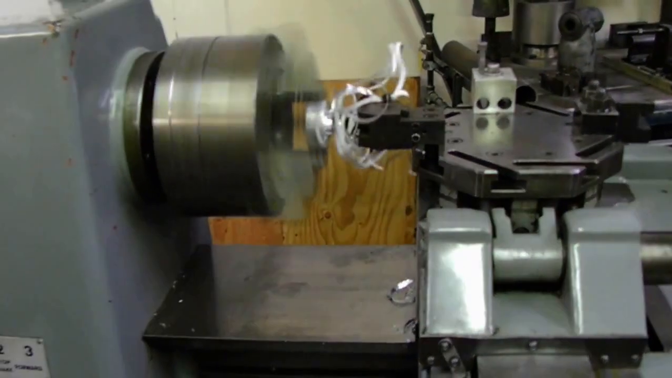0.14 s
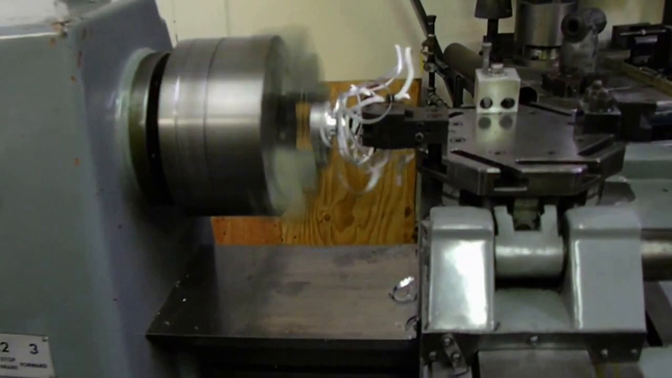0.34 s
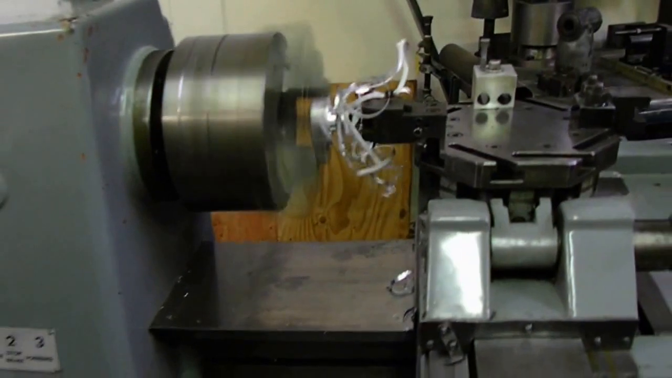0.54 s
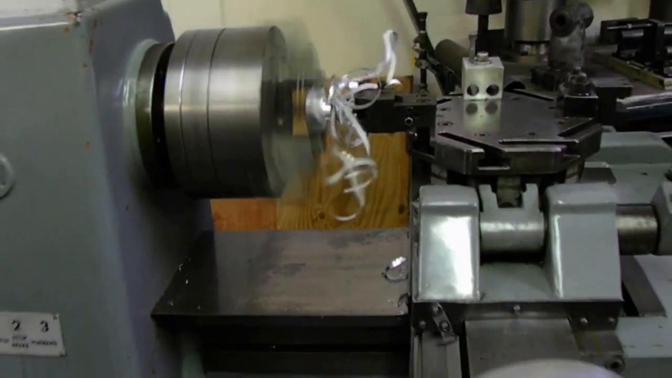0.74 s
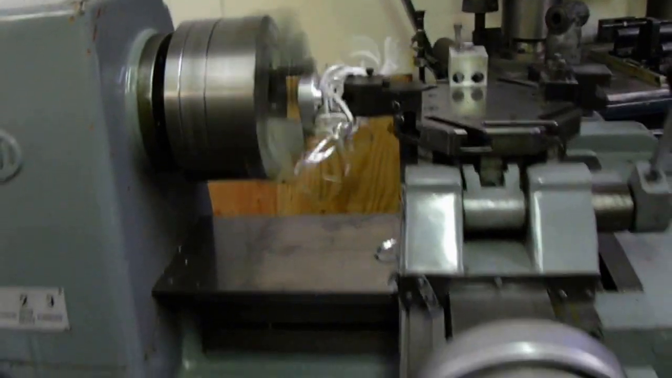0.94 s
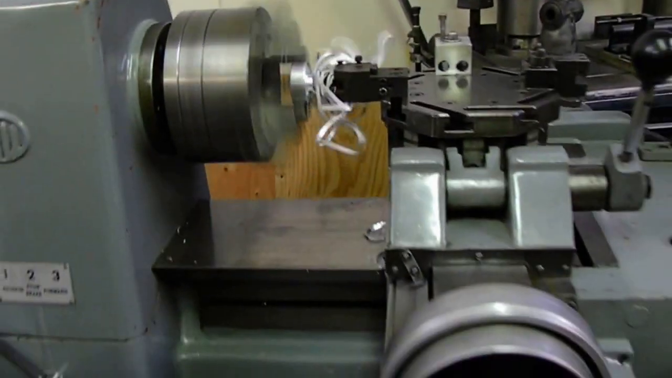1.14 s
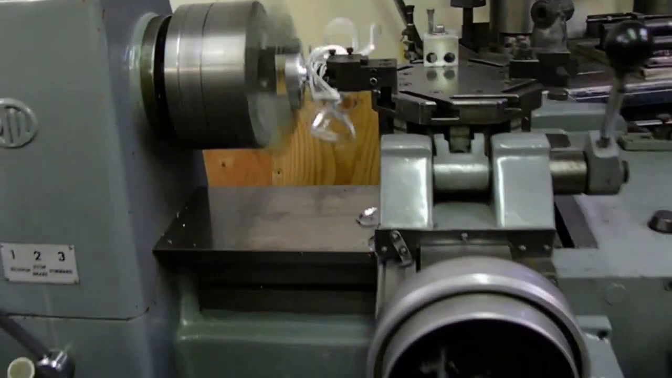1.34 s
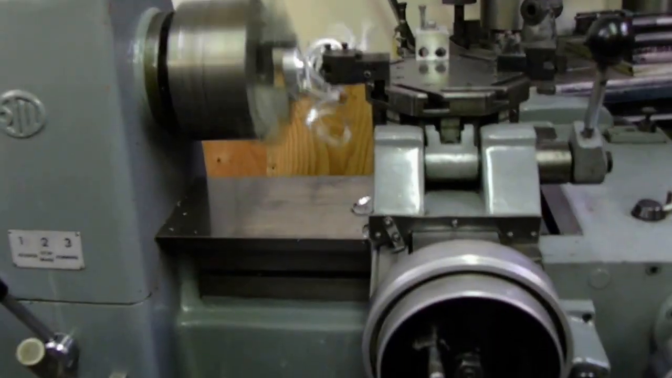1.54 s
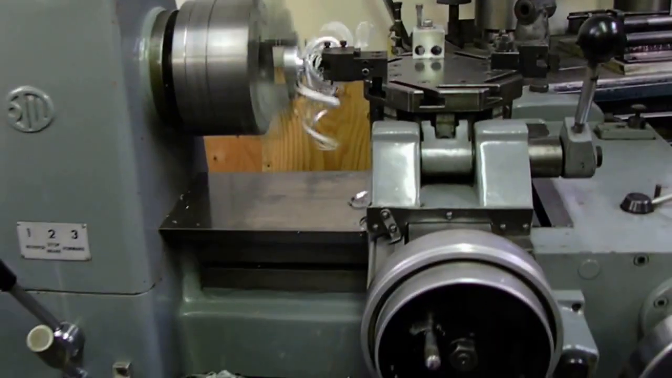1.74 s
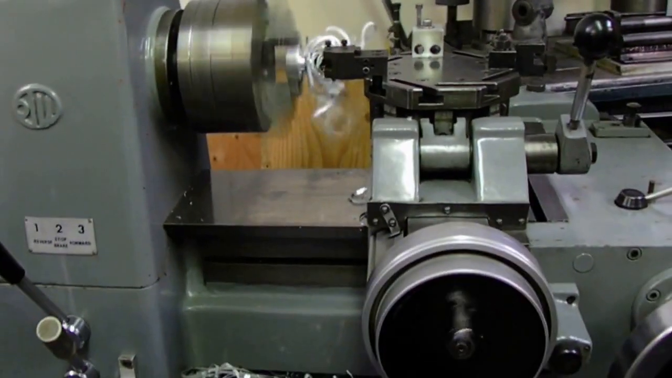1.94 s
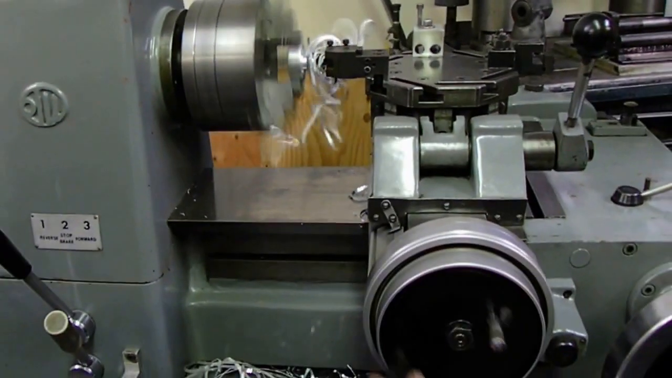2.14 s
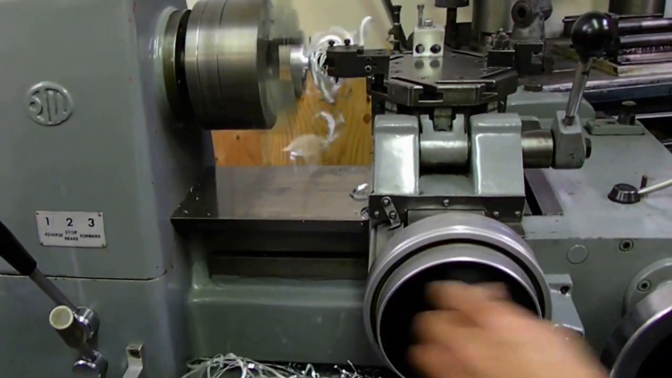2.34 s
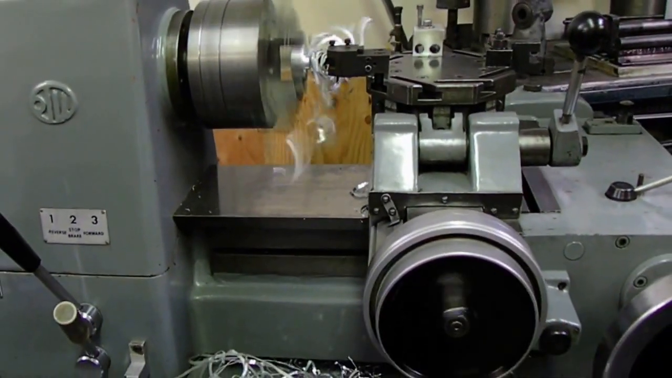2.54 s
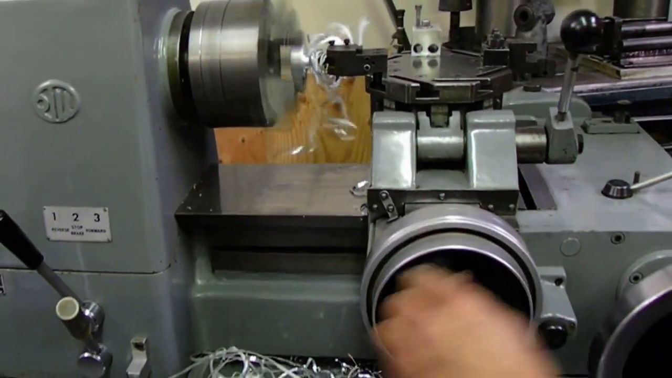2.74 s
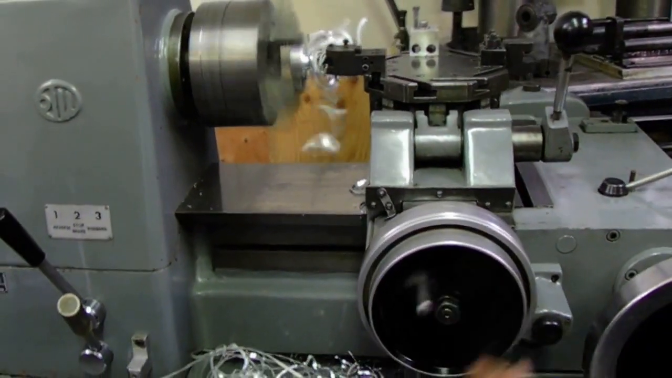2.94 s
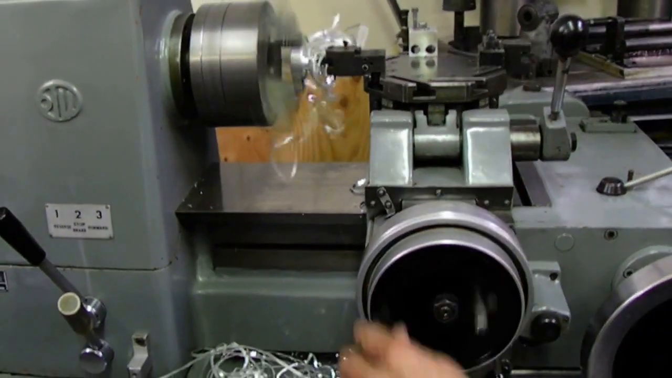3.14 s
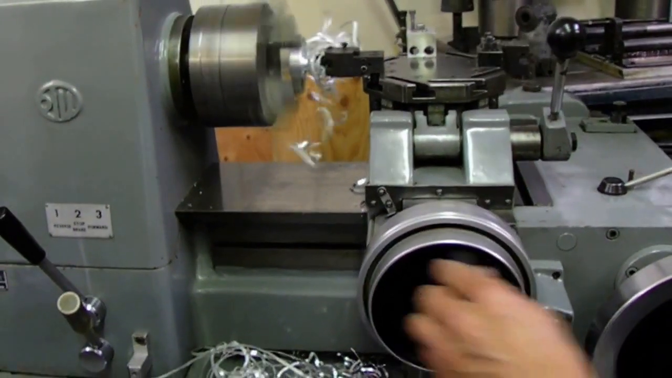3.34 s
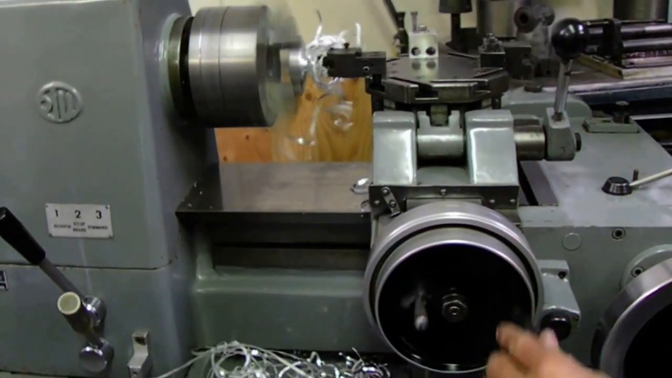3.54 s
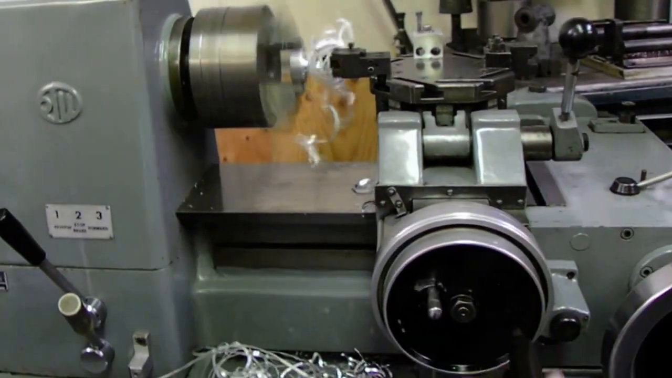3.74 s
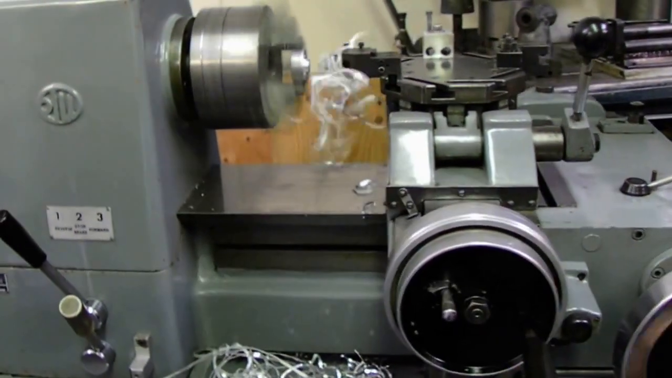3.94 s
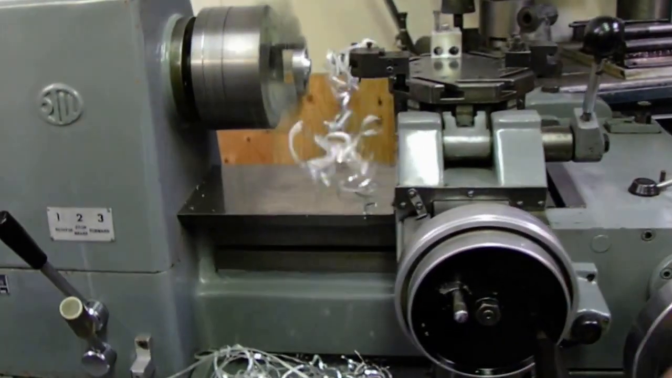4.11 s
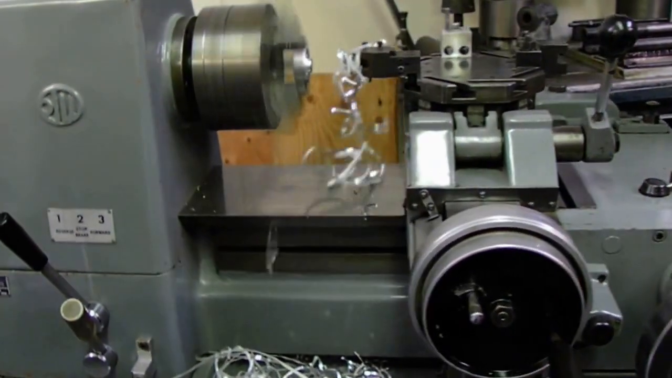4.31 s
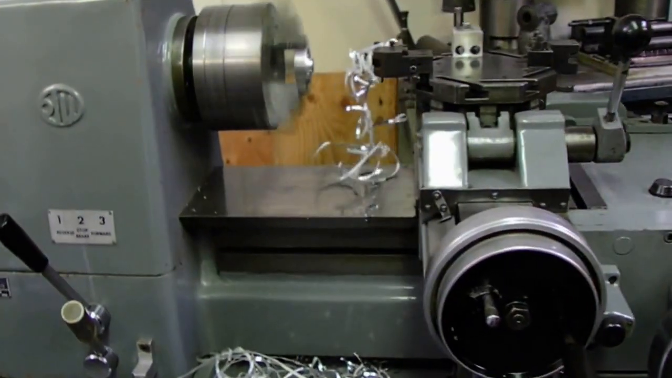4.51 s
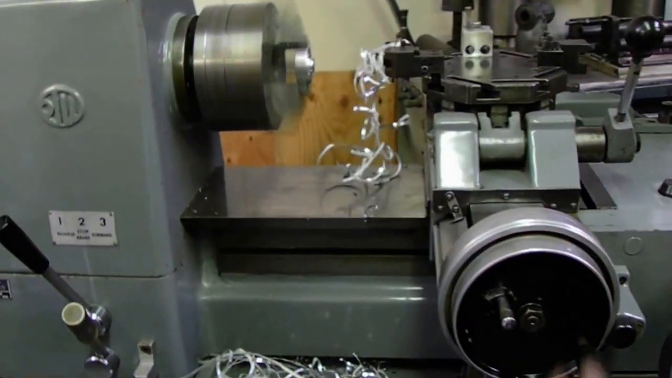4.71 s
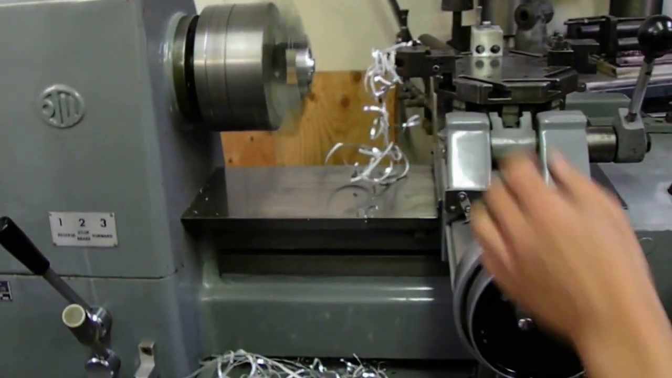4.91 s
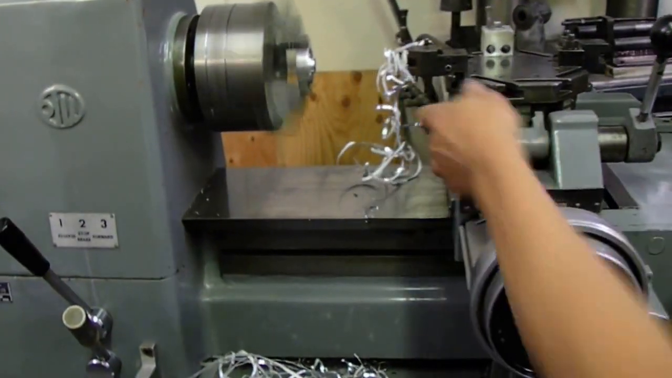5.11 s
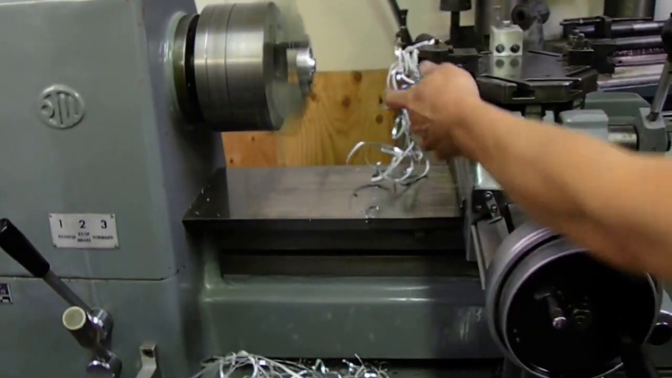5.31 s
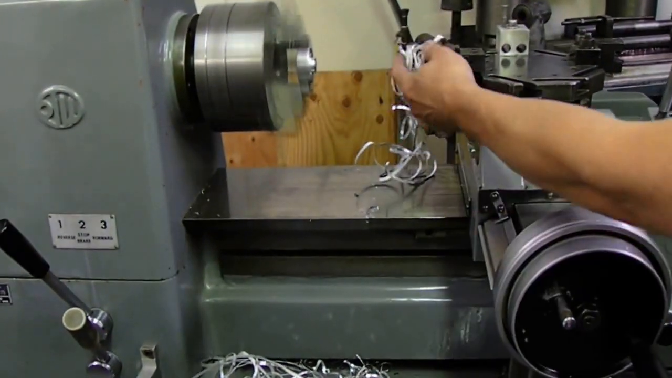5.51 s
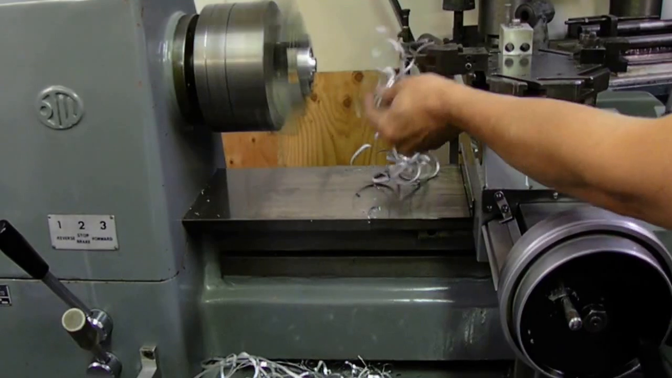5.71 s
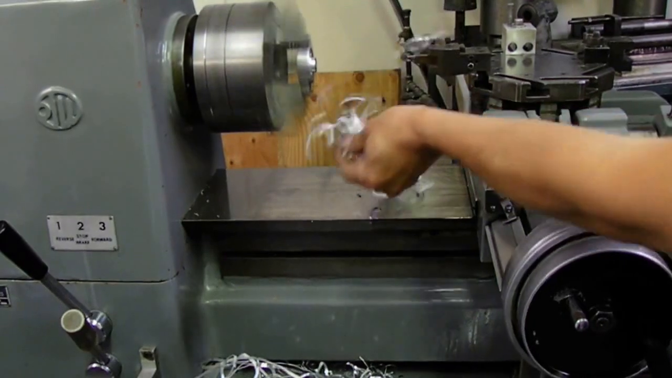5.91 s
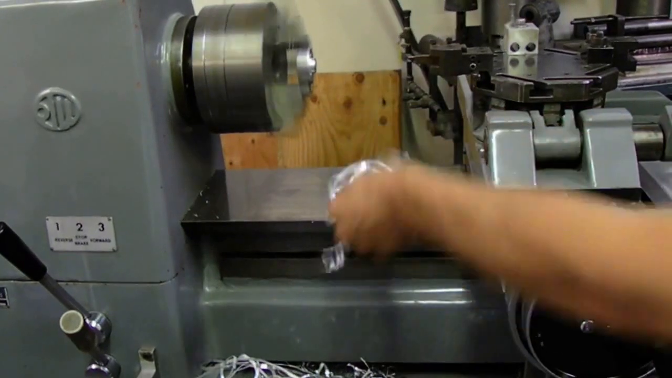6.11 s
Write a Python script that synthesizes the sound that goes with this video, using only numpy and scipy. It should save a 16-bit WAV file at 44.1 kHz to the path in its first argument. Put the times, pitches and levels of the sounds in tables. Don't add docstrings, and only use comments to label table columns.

```python
import sys
import numpy as np
from scipy import signal
from scipy.fft import rfft, irfft, next_fast_len
from scipy.io import wavfile
from scipy.ndimage import uniform_filter1d

SR = 44100
rng = np.random.default_rng(int(sys.argv[2]) if len(sys.argv) > 2 else 0)


def wav_out(sig):
    wavfile.write(sys.argv[1], SR, np.round(np.clip(np.atleast_2d(sig).T, -1, 1) * 32767).astype(np.int16))


def makeup_ratio(level_db):
    decades = np.asarray(level_db, float) / 20
    return 10 ** decades


N = 276066


def evened(x):
    return x / np.sqrt(np.mean(x ** 2) + 1e-20)


def curve(rows, column):
    rows = np.array(rows)
    return np.interp(np.arange(N) / SR, rows[:, 0], rows[:, column])


def shaped(x, gain):
    size = next_fast_len(N)
    return irfft(rfft(x, size) * gain(np.fft.rfftfreq(size, 1 / SR)), size)[:N]


FLAT_ABOVE_HZ = 15200


def spectrum_db(points, hz):
    f, db = np.transpose(points)
    return np.interp(np.log(np.minimum(hz, FLAT_ABOVE_HZ) + 1), np.log(f + 1), db)


def modes(table, hz):
    power = sum(makeup_ratio(db) ** 2 / (1 + (2 * (hz - f) / width) ** 2) ** 1.37 for f, width, db in table)
    return np.sqrt(power)


def wander(top_hz):
    steps = rng.standard_normal(N * 1000 // SR + 1002)
    pole = np.exp(-2 * np.pi * top_hz / 1000)
    slow = signal.filtfilt([1], [1, -pole], steps)[500:-500]
    return np.interp(np.arange(N) * 1000 / SR, np.arange(len(slow)), evened(slow - slow.mean()))


def grit(per_s, spread_db):
    size = makeup_ratio(spread_db * np.minimum(rng.exponential(1, N), 3)) * rng.choice([-1., 1.], N)
    return evened(size * (rng.random(N) < per_s / SR))


def add(mix, s, sound):
    part = mix[round(s * SR):][:len(sound)]
    part += sound[:len(part)]


# t60 in seconds, level in dB against the direct sound, lower edge in Hz.
SHOP_TAIL = (.35, -6, 2500)


def shop(x):
    t60_s, tail_db, above_hz = SHOP_TAIL
    age = np.arange(SR // 2) / SR
    tail = rng.standard_normal(len(age)) * makeup_ratio(-60 * age / t60_s) * (age > .003)
    bright = shaped(x, lambda hz: hz ** 2 / (hz ** 2 + above_hz ** 2))
    return x + makeup_ratio(tail_db) * signal.oaconvolve(bright, tail / np.linalg.norm(tail))[:N]


# time in seconds, roar in dB.
DRIVE_LEVEL = [
    (0, -29),
    (1, -29.5),
    (2, -31),
    (2.7, -29.5),
    (4.5, -28.5),
    (5.5, -27),
    (6.26, -26.5),
]
# frequency in Hz, density in dB per Hz.
ROAR_SPECTRUM = [(15, -89), (25, -39.5), (96, -21), (183, -19), (240, -17.5), (457, -13.5), (537, -9.5),
                 (804, -8.5), (919, -3.5), (1240, -5.5), (3440, -15.5), (6920, -16.5), (7910, -22),
                 (9300, -21.5), (15500, -60)]
# frequency in Hz, width in Hz, gain in dB.
CASING_MODES = [(107, 35, 6), (204, 86, -10.5), (242, 32, 10), (557, 28, 7.5), (679, 77, 5), (806, 100, -2),
                (901, 54, 4), (1026, 37, 4.5), (1290, 214, -5.5), (1570, 75, -1), (1918, 44, 6.5),
                (3490, 50, 7.5), (4580, 180, 4.5), (6900, 540, 1.5)]
GEAR_TONES_HZ = [89.5, 102.3, 110, 120, 359.5, 534, 543, 693, 899, 927.5, 954, 1015, 1096, 1174, 1315, 1476,
                 1555, 2003]
# level in dB relative to the roar, waver in Hz.
GEAR_LEVELS = [(-46, 0.14), (-35, 1.04), (-49, .3), (-36.5, 0.17), (-23.5, 2.64), (-17.5, 3.15),
               (-20.5, 3.23), (-21.5, 6.03), (-16, 3.45), (-8, 3.05), (-20, 3.4), (-21.5, 4.2), (-21, 4.14),
               (-21, 3.4), (-20.5, 2.24), (-23, 2.4), (-17, 1.15), (-25, 6.7)]
BEARINGS_DB = -0.5
LOADED_DB, FREE_DB, LOADED_UNTIL_S, FREE_FROM_S = -5.5, 2.5, 0.7, 5


def headstock():
    def casing(hz):
        peaks_db = sum(db * np.exp(-(2 * (hz - f) / width) ** 2 / 2) for f, width, db in CASING_MODES)
        return makeup_ratio(spectrum_db(ROAR_SPECTRUM, hz) + peaks_db)
    rumble = rng.standard_normal(N) + 0.22 * grit(1500, spread_db=3.5)
    roar = evened(shaped(rumble, casing))
    treble = shaped(roar, lambda hz: hz ** 2 / (hz ** 2 + 2500 ** 2))
    roar = roar + (makeup_ratio(BEARINGS_DB) - 1) * treble
    tones = 0
    for hz, (db, waver_hz) in zip(GEAR_TONES_HZ, GEAR_LEVELS):
        phase = 2 * np.pi * (np.cumsum(hz + waver_hz * wander(5.84)) / SR + rng.random())
        tones = tones + makeup_ratio(db + 1.8 * wander(6)) * np.sin(phase)
    load_db = curve([(LOADED_UNTIL_S, LOADED_DB), (FREE_FROM_S, FREE_DB)], 1)
    return makeup_ratio(curve(DRIVE_LEVEL, 1) + 2.0) * (roar + makeup_ratio(load_db + 1) * tones)


def ring(hz, db, t60_s):
    age = np.arange(4000) / SR
    return makeup_ratio(db - 60 * age / t60_s) * (1 - np.exp(-age * hz * 0.84)) * np.sin(2 * np.pi * hz * age)


# time in seconds, peak in dB, pitch in Hz.
CURL_TICKS = [(4.2826, -15.5, 8870), (4.4637, -18.5, 8960), (4.5432, -24, 9680), (4.5696, -19, 8700),
              (4.7801, -19, 9200), (4.87, -22, 9130), (4.984, -18, 9350), (5.0973, -18, 9340),
              (5.1648, -20, 9200), (5.276, -24, 9290), (5.2994, -23, 9670), (5.3778, -27, 8470),
              (5.4585, -17.5, 8950), (5.5494, -20, 8800)]
# time in seconds, peak in dB.
LATCH_KNOCK = (4.6669, -5.5)
# frequency in Hz, level in dB, t60 in seconds.
LATCH_MODES = [(1480, -8, .02), (1720, -8, .015), (1920, -9, .018), (2120, -1, .009), (2450, -4, .007),
               (2800, -2, .007), (3150, -3, .007), (3550, -5, .008), (4560, -27, .2)]


def small_hits():
    out = np.zeros(N)
    for s, db, hz in CURL_TICKS:
        tick = ring(hz, db - 2.5, 0.019) + ring(.76 * hz, db - 0.5, 0.0098) + ring(1.08 * hz, db - 7, .01)
        add(out, s, tick)
    knock_s, knock_db = LATCH_KNOCK
    knock = sum(ring(*mode) for mode in LATCH_MODES)
    add(out, knock_s, makeup_ratio(knock_db) * knock / abs(knock).max())
    return shaped(out, lambda hz: hz ** 4 / (hz ** 4 + 900 ** 4))


# time in seconds, depth in dB.
CUT_DEPTH = [
    (0, -1.5),
    (.75, -1.5),
    (1.05, -6),
    (1.2, -10.5),
    (1.5, -8),
    (1.8, -13),
    (1.9, -10),
    (2.05, -39.5),
    (2.3, -70),
]
# frequency in Hz, width in Hz, level in dB.
TIP_MODES = [(5140, 320, -13.5), (6820, 250, -11.5), (7190, 200, 0.5), (7376, 230, 3), (8500, 620, -6.5),
             (9440, 270, -6), (9820, 160, -3.5), (10300, 470, -8.5)]
# frequency in Hz, width in Hz, level in dB.
HOLDER_MODES = [(1490, 58, 1), (1638, 41, 1), (1785, 180, -5), (1170, 150, -10)]
# frequency in Hz, width in Hz, level in dB.
SHANK_MODES = [(2668, 67, 5.5), (2890, 280, -3.5), (4200, 350, -0.5), (4720, 67, 0)]
# level in dB at full depth, dB per dB of depth.
TOOL_PARTS = [
    (-22.5, 1.3),
    (-28, 0.5),
    (-30, 1.0),
    (-32, 0.83),
]


def tool():
    tearing = rng.standard_normal(N) + 0.13 * grit(2500, spread_db=-4.0)
    tearing = tearing * makeup_ratio(1.9 * wander(69))
    depth_db = curve(CUT_DEPTH, 1)
    out = np.zeros(N)
    for (db, follow), table in zip(TOOL_PARTS, (TIP_MODES[:4], TIP_MODES[4:], HOLDER_MODES, SHANK_MODES)):
        part = evened(shaped(tearing, lambda hz: modes(table, hz)))
        out += makeup_ratio(db + follow * depth_db + 2.5) * part
    return out


def tinkle(per_s, cycles, count=24):
    clicks = grit(per_s, spread_db=2.0)
    curl = rng.integers(0, count, N)
    t = np.arange(600) / SR
    pitch_hz = np.linspace(3500, 15500, count) * rng.uniform(0.94, 1.0, count)
    out = np.zeros(N)
    for k, hz in enumerate(pitch_hz):
        envelope = np.sqrt(hz) * (1 - np.exp(-t * hz / 2)) * np.exp(-t * hz / cycles)
        out += signal.oaconvolve(clicks * (curl == k), envelope * np.sin(2 * np.pi * hz * t))[:N]
    return evened(out)


def patchy(x, patch_db):
    z = signal.stft(x, nperseg=256, noverlap=192)[2]
    across_hz = uniform_filter1d(rng.standard_normal(z.shape), size=4, axis=0)
    patches = uniform_filter1d(across_hz, size=16, axis=1)
    return signal.istft(z * makeup_ratio(patch_db * evened(patches)), nperseg=256, noverlap=192)[1][:N]


# time in seconds, peak in dB.
WHIP_LEVEL = [
    (1.39, -9),
    (1.83, -9),
    (1.93, -14),
    (2.155, -11.5),
    (2.208, -7.5),
    (2.35, -8.5),
    (2.535, -13),
    (2.59, -7),
    (2.65, -7.5),
]
TURN_S, FIRST_TURN_S, SLIP_S, UNEVEN_DB = .0543, 1.394, .002, .3


def turns(count=24):
    slip, uneven = rng.standard_normal((count, 2)).T
    s = FIRST_TURN_S + TURN_S * np.arange(count)
    peak_db = np.interp(s, *np.transpose(WHIP_LEVEL)) + UNEVEN_DB * uneven
    return list(zip(s + SLIP_S * slip, peak_db))


# time in seconds, rustle in dB.
RUSTLE_LEVEL = [(0, -24.5), (.454, -25.5), (1.026, -22), (1.75, -39), (1.9, -33), (2.174, -37), (2.48, -33),
                (2.7, -28.5), (2.82, -24.5), (3.348, -19), (3.8, -23), (4.04, -20), (4.312, -35),
                (4.75, -54), (5.56, -44), (5.668, -28.5), (5.85, -24.5), (6.26, -36.5)]
# frequency in Hz, density in dB per Hz.
SWARF_SPECTRUM = [(1470, -28), (2500, -16.5), (3800, -11), (4600, -10), (6150, -4.5), (7300, -2.5),
                  (8300, -1.5), (8800, 0.5), (10000, -1), (11500, -4), (13000, -3), (15200, -4.5)]
# time in seconds, peak in dB.
STRAY_LASHES = [(.07, -15), (.12, -10), (.227, -19), (.477, -8), (.822, -11), (.946, -9.5), (1.003, -12),
                (1.044, -12), (1.108, -9), (1.17, -9), (1.213, -8.5), (1.244, -17), (1.311, -10.5),
                (1.348, -9.5), (2.724, -16), (2.789, -11), (2.855, -8.5), (2.916, -8), (3.055, -7.5),
                (3.131, -18), (3.173, -12), (3.216, -10), (3.433, -17), (3.675, -12), (3.708, -13)]
# time in seconds, peak in dB, length in seconds.
HAND_GRABS = [(3.823, -7, .028), (3.853, -5.5, .018), (3.877, -9, .027), (3.905, -8, 0.017),
              (3.986, -15, 0.02), (4.03, -11, .012), (4.103, -10.5, .033), (4.23, -22, 0.028),
              (4.543, -25, .027), (4.642, -27.5, .025), (5.458, -23, .022), (5.6, -21, .025),
              (5.642, -13, .025), (5.69, -12, 0.015), (5.747, -15, .028), (5.797, -5.5, .009),
              (5.845, -13, 0.029), (5.99, -4, 0.012), (6.012, -7, 0.018), (6.192, -18, 0.027),
              (6.237, -20, .025)]
LASH_S, WHIP_S, RISE_S = 0.024, .021, 0.0057
PACKED, WHIRLED, HELD, LASH_BRIGHT = -0.47, 1.3, -1.8, 2.2
LOOSE_S, HELD_S = 2, 4.07
REST_BELOW_DB, REST_DULLING = -29.5, 0.81


def swarf():
    age, t = np.arange(SR // 2) / SR, np.arange(N) / SR
    bed = makeup_ratio(curve(RUSTLE_LEVEL, 1)) ** 2
    power = bed.copy()
    strays = [(s, db, LASH_S) for s, db in STRAY_LASHES]
    whips = [(s, db, WHIP_S) for s, db in turns()]
    for s, db, length_s in strays + whips + HAND_GRABS:
        drag = makeup_ratio(db - 7.0 - 4.17 * (age / length_s) ** 1.01)
        add(power, s - .003, (drag * (1 - np.exp(-age / RISE_S))) ** 2)
    state = np.where(t < LOOSE_S, PACKED, np.where(t < HELD_S, WHIRLED, HELD))
    bright = uniform_filter1d(state, size=6000) + LASH_BRIGHT * (.5 - bed / power)
    bright -= REST_DULLING * np.maximum(REST_BELOW_DB - 10 * np.log10(power), 0)
    crackle = rng.standard_normal(N) + 0.57 * tinkle(2000, cycles=10.7)
    crackle = patchy(crackle * makeup_ratio(0.91 * wander(105)), patch_db=1.0)
    hiss = evened(shaped(crackle, lambda hz: makeup_ratio(spectrum_db(SWARF_SPECTRUM, hz))))
    low = shaped(hiss, lambda hz: 1 / (1 + (hz / 8000) ** 4))
    return np.sqrt(power) * (hiss + (makeup_ratio(-bright) - 1) * low)


def scene():
    return np.tile(shop(headstock() + tool()) + swarf() + small_hits(), (2, 1))


def top_cut(x):
    return signal.sosfilt(signal.butter(12, 16640, fs=SR, output="sos"), x)


# frequency in Hz, width in Hz, depth from 0 to 1.
CAVITY_NOTCH = (7800, 430, 0.96)
TOP_EDGE_HZ = 15740


def record(dry):
    notch_hz, width_hz, depth = CAVITY_NOTCH

    def microphone(hz):
        notch = 1 - depth / (1 + (2 * (hz - notch_hz) / width_hz) ** 2)
        return notch * np.clip((TOP_EDGE_HZ + 60 - hz) / 120, 0, 1) ** 2
    mono = shaped(dry[0], microphone)
    return top_cut(np.tile(mono, (2, 1)))


dry = scene()
out = record(dry)
wav_out(out)
```